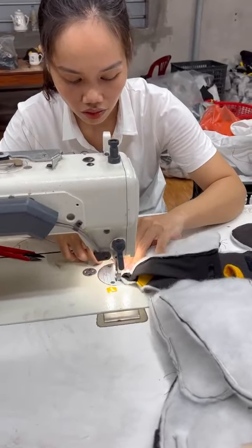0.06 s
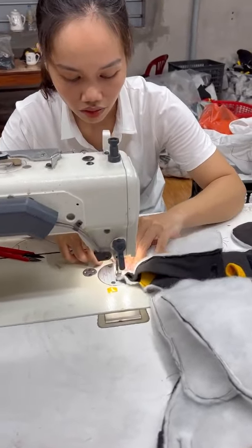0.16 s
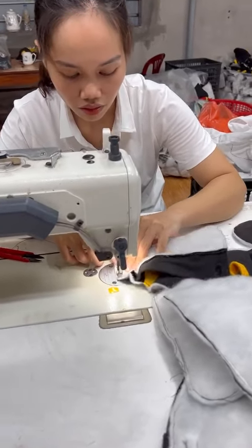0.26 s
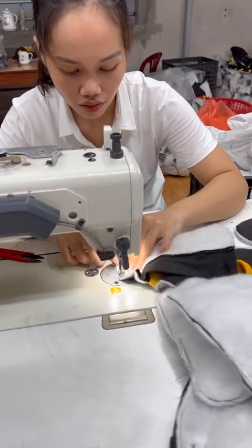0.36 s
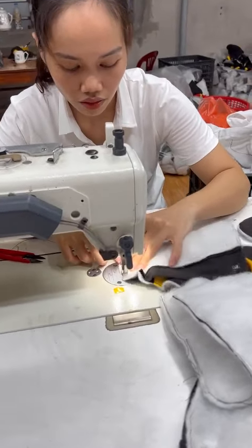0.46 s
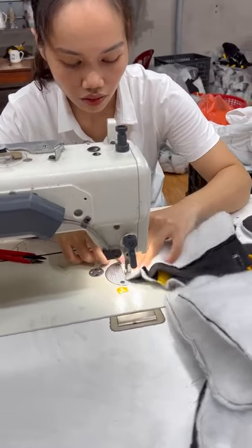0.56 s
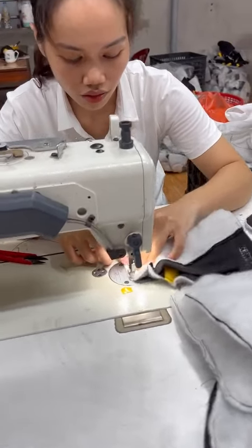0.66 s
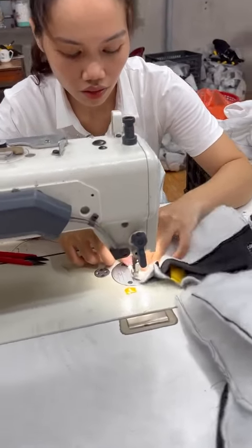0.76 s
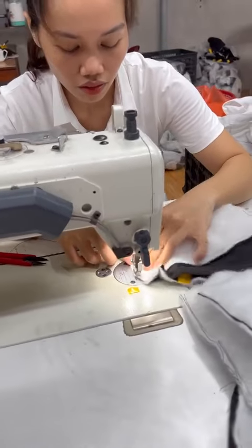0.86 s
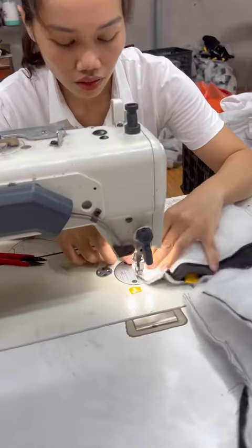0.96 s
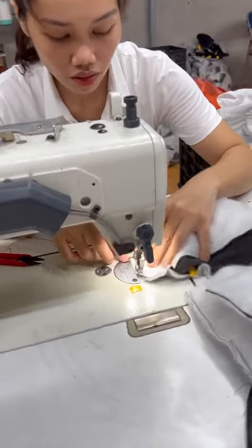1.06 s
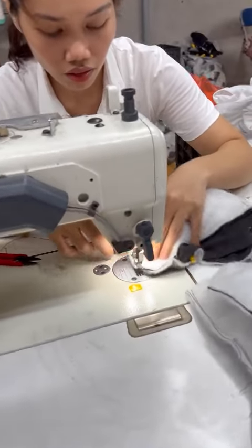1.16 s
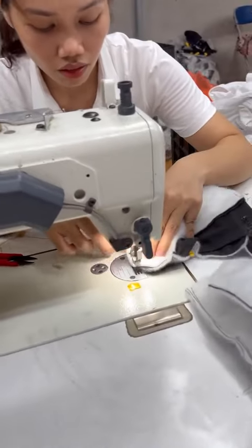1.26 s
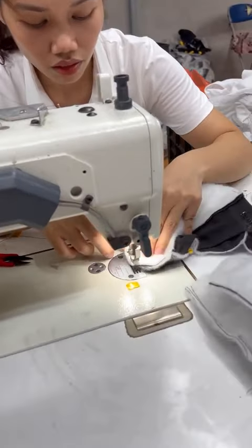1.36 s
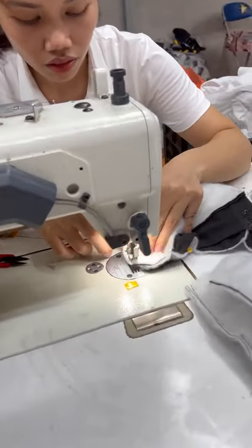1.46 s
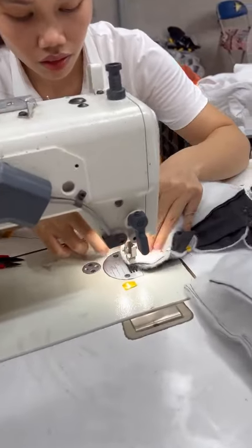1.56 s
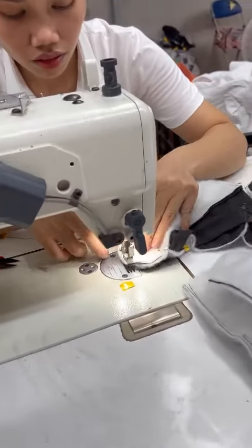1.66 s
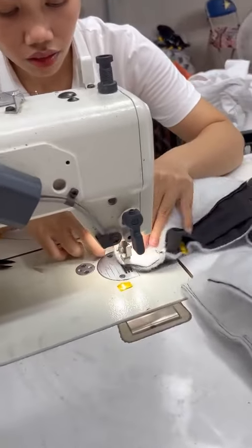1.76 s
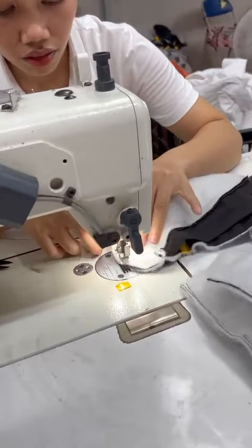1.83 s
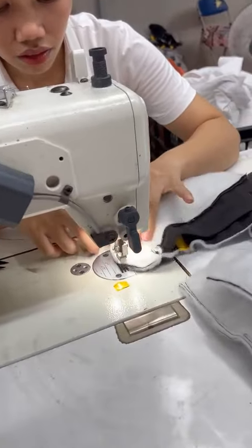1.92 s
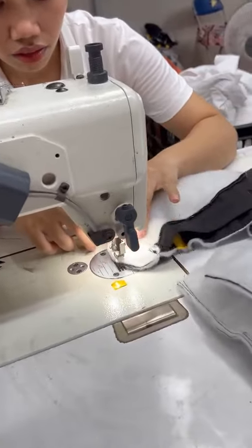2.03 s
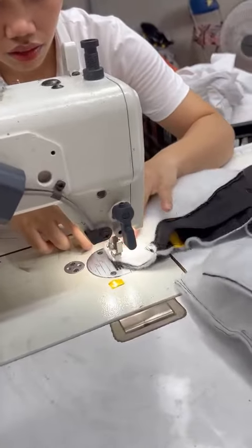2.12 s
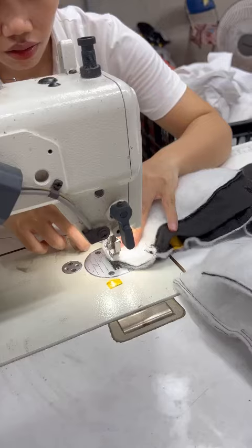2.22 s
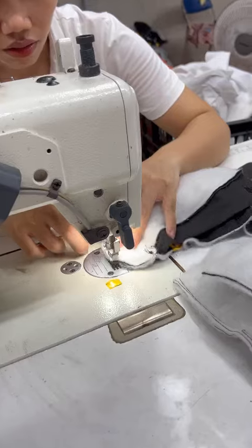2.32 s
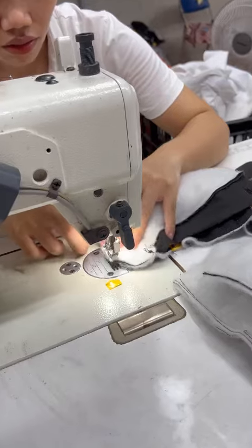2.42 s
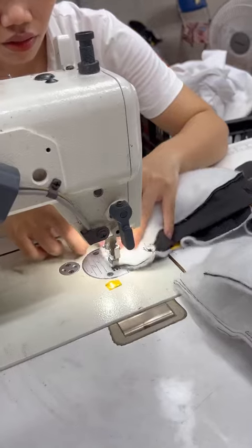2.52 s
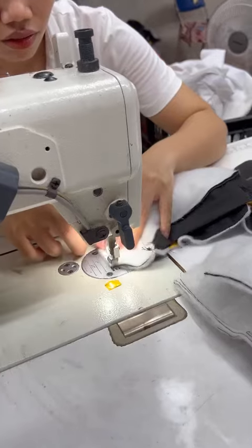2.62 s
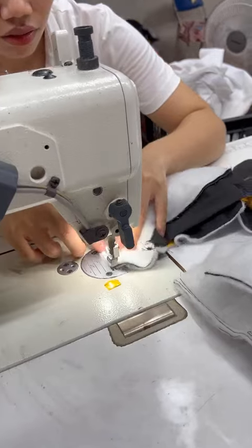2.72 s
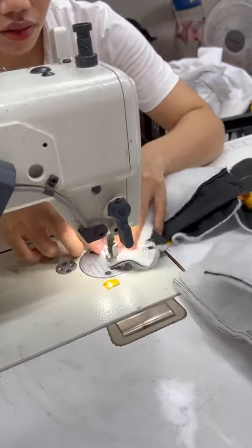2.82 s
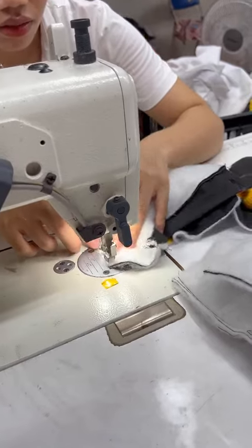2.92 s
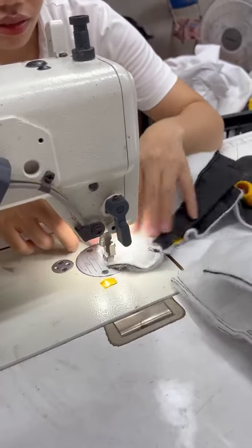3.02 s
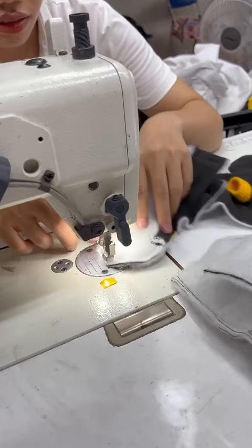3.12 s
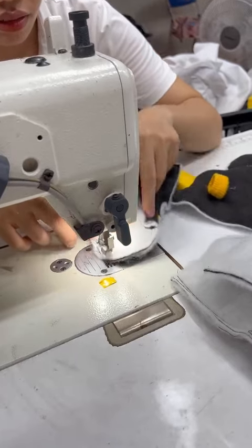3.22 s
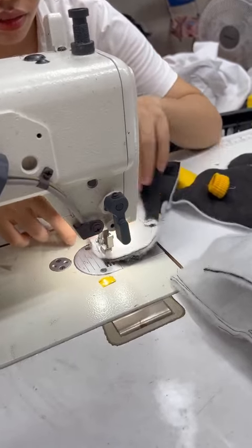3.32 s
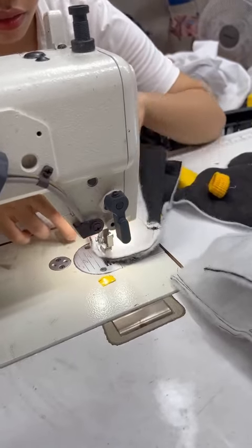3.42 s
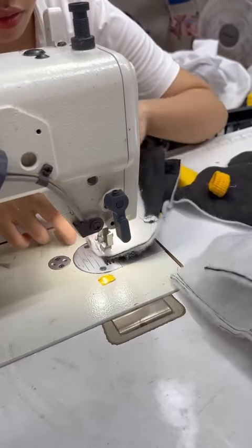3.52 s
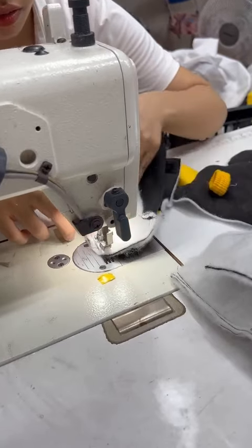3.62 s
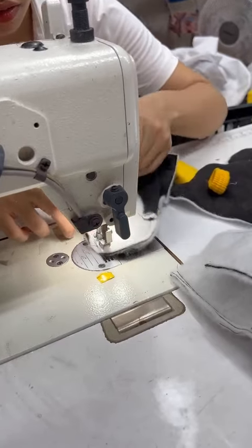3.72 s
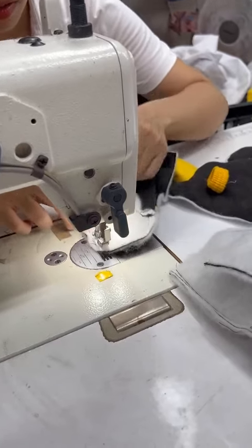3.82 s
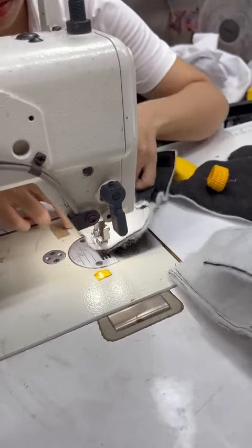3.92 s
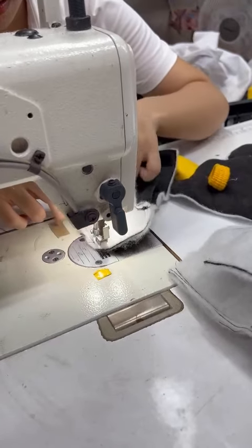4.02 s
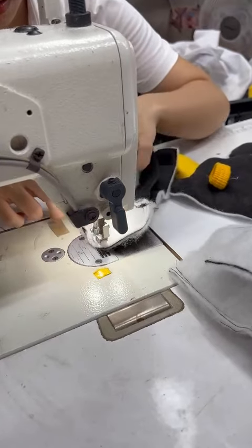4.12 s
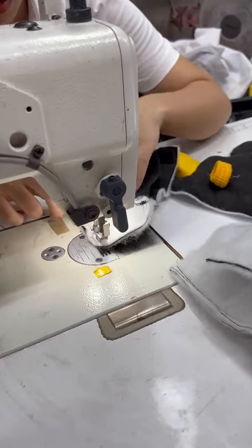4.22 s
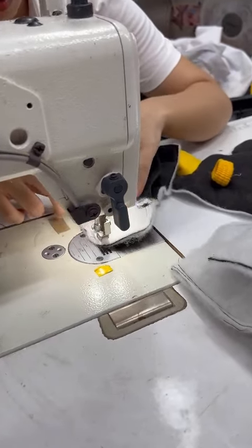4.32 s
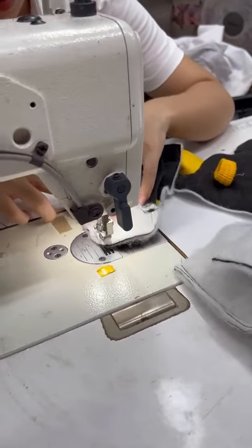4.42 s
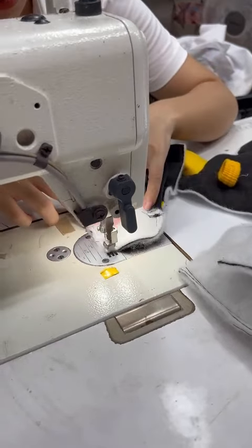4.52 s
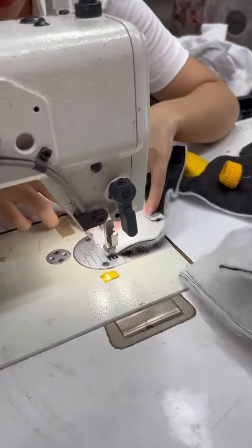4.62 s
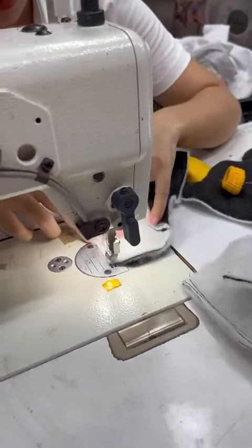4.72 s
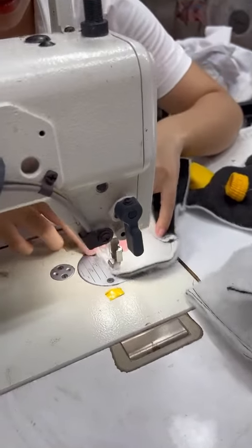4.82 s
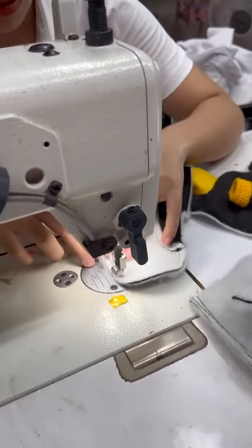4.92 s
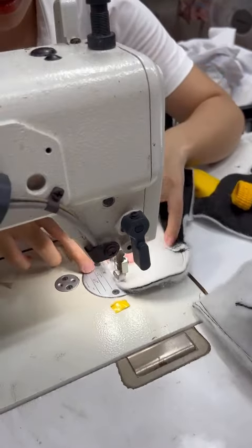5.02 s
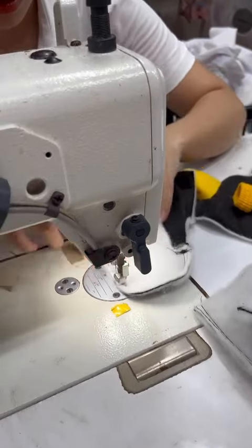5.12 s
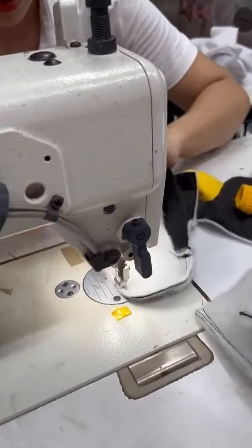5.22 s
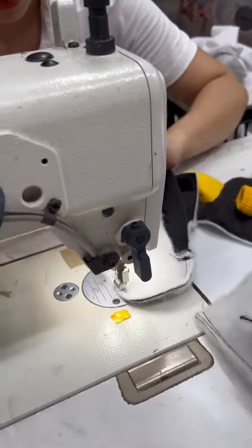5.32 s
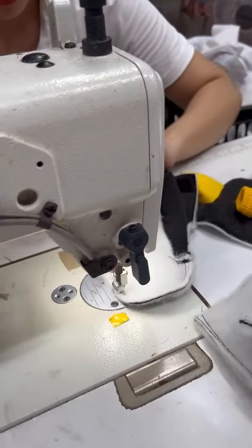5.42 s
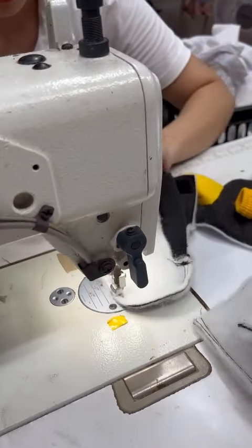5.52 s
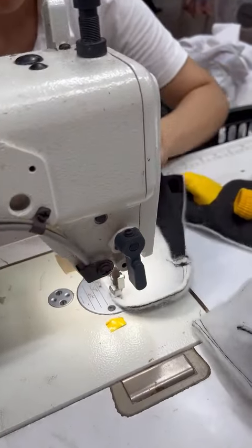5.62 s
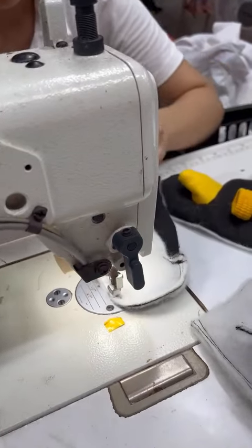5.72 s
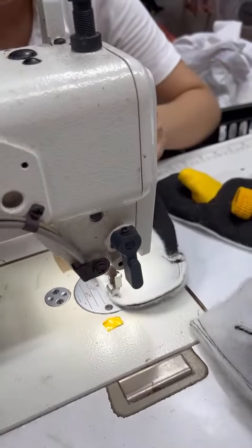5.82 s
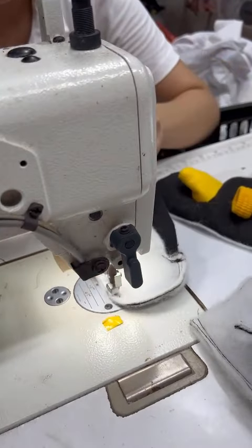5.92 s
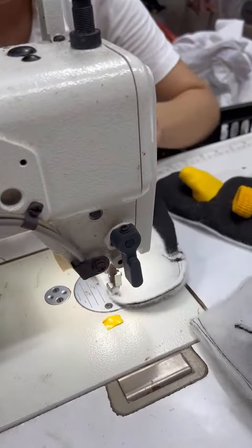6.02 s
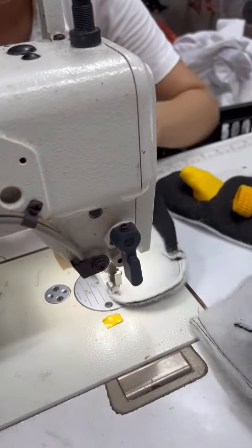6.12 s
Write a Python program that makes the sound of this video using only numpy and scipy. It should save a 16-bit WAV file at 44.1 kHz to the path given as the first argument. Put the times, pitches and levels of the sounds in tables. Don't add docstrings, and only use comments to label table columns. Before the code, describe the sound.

Two very short machine-gun-like stitching buzzes come early, then a loud clack of the presser foot and a pause with small clicks. A slightly louder burst comes midway, another foot clack follows, then a long pause of thuds and ticks before the last and longest burst. It ends in light clicks and table bumps. Close stereo microphone at the machine, modest indoor reverberation, constant low hum and fan behind.

```python
import sys
import numpy as np
from scipy import signal
from scipy.fft import rfft, irfft, next_fast_len
from scipy.io import wavfile
from scipy.ndimage import uniform_filter1d

SR = 44100
rng = np.random.default_rng(int(sys.argv[2]) if len(sys.argv) > 2 else 0)


def generate_wav(signal):
    frames = np.transpose(np.atleast_2d(signal))
    scaled = np.clip(frames, -1, 1) * 32767
    pcm = np.round(scaled).astype(np.int16)
    wavfile.write(sys.argv[1], SR, pcm)


def gain_from_db(level_db):
    decades = np.asarray(level_db, float) / 20
    return 10 ** decades


N = 272097
TOP_STITCHES_HZ = 70.0


def rms_one(x):
    return x / np.sqrt(np.mean(x ** 2) + 1e-20)


def in_time(tables, rest):
    t = np.arange(N) / SR
    out = np.full((len(tables[0][0]) - 1, N), float(rest))
    for rows in tables:
        s, *columns = np.transpose(rows)
        inside = (t >= s[0]) & (t <= s[-1])
        out[:, inside] = [np.interp(t[inside], s, column) for column in columns]
    return out


def colour(x, points, turn=1):
    size = next_fast_len(N)
    hz = np.arange(size // 2 + 1) * SR / size + 0.0011
    points = np.array(points)
    gain = gain_from_db(np.interp(np.log(hz), np.log(points[:, 0]), points[:, 1]))
    return irfft(rfft(x, size) * gain * turn, size)[..., :N]


def drift(rate):
    r = np.exp(-80 * np.pi * rate / SR)
    noise = rng.standard_normal(N // 40 + 2002)
    slow = signal.lfilter([1], [1, -2 * r, r * r], noise)[2000:]
    return np.interp(np.arange(N) / 40, np.arange(len(slow)), rms_one(slow))


def resonance(x, hz, width_hz):
    r = np.exp(-np.pi * width_hz / SR)
    poles = [1, -2 * r * np.cos(2 * np.pi * hz / SR), r * r]
    return signal.lfilter([(1 - r * r) / 2, 0, (r * r - 1) / 2], poles, x)


def ring(hz, t60, size):
    t = np.arange(size) / SR
    return np.sin(2 * np.pi * hz * t) * gain_from_db(-60 * t / max(t60, .005))


def add(out, s, sound):
    at = round(s * SR)
    out[at:at + len(sound)] += sound[:N - at]


# multiple of stitch rate, level in dB.
SHAKE_ORDERS = [(3, -27.5), (5, -16), (6, -21), (7, -27), (8, -23), (9, -22), (10, -33)]


def table_shake(angle, speed, once, twice, fourfold):
    higher = sum(gain_from_db(db + 3.5 * drift(12)) * np.cos(k * angle + .9 * k * k + .5 * drift(10))
                 for k, db in SHAKE_ORDERS)
    first = once * (np.cos(angle) + 0.62 * higher)
    third = gain_from_db(4.5) * (1 - speed / TOP_STITCHES_HZ) * np.cos(3 * angle)
    return first + fourfold * np.sin(4 * angle) - twice * (np.sin(2 * angle) + third)


def contacts(size, per_s, spread_db):
    strengths = gain_from_db(spread_db * np.minimum(rng.exponential(1, size), 5))
    signs = rng.choice([-1, 1], size)
    return rms_one(strengths * signs * (rng.random(size) < per_s / SR))


# frequency in Hz, level in dB per Hz.
RATTLE_COLOUR = [(60, -32.5), (100, -10.5), (200, -5.5), (380, -15), (640, -14), (780, -21), (1300, -21),
                 (2050, -12), (2810, -19.5), (6170, -26), (14400, -32), (15600, -35.5), (16500, -56.5)]
# frequency in Hz,
# width in Hz, level in dB.
CASTING = [(100, 25, 9), (380, 25, 5), (1270, 70, -7), (1620, 70, -2), (1780, 110, 1), (2040, 120, 1),
           (2310, 100, -2), (2450, 60, -2), (3450, 250, -7), (4640, 220, -3), (5760, 200, -9),
           (6200, 260, -3), (8030, 300, -11), (9400, 200, -12)]


def casting_rattle(angle, turns, speed):
    slots = 630
    one_turn = np.array([contacts(slots, per_s=5000, spread_db=3.0) for draw in "ab"])
    looped = one_turn[:, (turns % 1 * slots).astype(int)]
    hits = 0.45 * looped + np.array([contacts(N, per_s=4500, spread_db=2.5) for draw in "ab"])
    swell = gain_from_db(2.36 * np.cos(angle - 1.9) + 0.75 * np.cos(3 * angle))
    later = np.roll(hits, 5040, axis=1)
    rung = sum((-1) ** k * gain_from_db(db) * resonance(later, hz, width_hz)
               for k, (hz, width_hz, db) in enumerate(CASTING))
    bare = rms_one(colour(hits, RATTLE_COLOUR))
    rattle = rms_one(bare * swell ** .4 + .5 * rms_one(rung) * swell)
    treble = signal.sosfilt(signal.butter(2, 3000, "high", fs=SR, output="sos"), rattle)
    return rattle - treble * (1 - uniform_filter1d(speed, size=900) / TOP_STITCHES_HZ)


# multiple of stitch rate, level in dB over the rattle.
TEETH = [(14, -18.5), (18, -19.5), (23, -21), (25, -13), (26, -21.5), (29, -17), (30, -23.5), (33, -23.5),
         (35, -13)]


def gear_teeth(angle, speed):
    teeth = sum(gain_from_db(db + 3.0 * drift(12)) * np.sin(k * angle + k * k) for k, db in TEETH)
    return teeth * (speed / TOP_STITCHES_HZ) ** 16


def machine():
    speed, once, twice, fourfold, clatter = drive()
    turns = np.cumsum(speed) / SR
    angle = 2 * np.pi * turns
    shake = table_shake(angle, speed, once, twice, fourfold)
    rattle = casting_rattle(angle, turns, speed)
    rattle[0] += gear_teeth(angle, speed)
    rattle *= gain_from_db(2.5) * clatter
    return shake + rattle[0], rattle[1]


# up to speed in seconds, brake in seconds, table shake in dB,
# second order under it in dB, fourth order under it in dB.
BURSTS = [
    (-.3, -.096, -19, 12, -15),
    (0.161, 0.312, -14, -8, -12.5),
    (0.651, .735, -13.5, -8, -14),
    (2.656, 2.802, -11.5, -8.5, -17.5),
    (4.72, 4.921, -10.5, -8, -33),
]
# seconds from up to speed, shake in dB, second order in dB, rattle in dB.
RUN_UP = [
    (-.09, -52, -44, -33),
    (-.055, -42, -33, -11.5),
    (-.03, -25, -2.5, -4.5),
    (-.008, -2, 2.5, 0.04),
    (.04, 0.9, 1.2, 0.2),
]
# seconds from the brake, shake in dB, second order in dB, rattle in dB.
RUN_DOWN = [
    (-.015, 0.15, 1, -1),
    (.006, -1, -8.5, -9),
    (0.019, -10, -16, -15),
    (.034, -13.5, -11.5, -17.5),
    (0.093, -39.5, -27, -27),
    (.22, -89, -60.5, -30.5),
]
# seconds from up to speed, share of top speed.
SPIN_UP = [(-.09, .36), (-.045, .72), (-.015, .86), (0, .96), (.025, 1)]
# seconds from the brake, share of top speed.
SPIN_DOWN = [(.012, 1), (.035, .9), (.095, .43), (.22, .3)]


def drive():
    spins, levels = [], []
    for up, brake, db, second, fourth in BURSTS:
        spins.append([(at + s, share) for at, steps in ((up, SPIN_UP), (brake, SPIN_DOWN))
                      for s, share in steps])
        levels.append([(at + s, db + shake, db + second + twice, db + fourth + shake, db - 8.5 + rattle)
                       for at, steps in ((up, RUN_UP), (brake, RUN_DOWN))
                       for s, shake, twice, rattle in steps])
    speed = TOP_STITCHES_HZ * in_time(spins, rest=.3)[0]
    once, twice, fourfold, rattle = uniform_filter1d(gain_from_db(in_time(levels, rest=-120)), size=250)
    return speed, np.sqrt(2) * once, np.sqrt(2) * twice, np.sqrt(2) * fourfold, rattle


# frequency in Hz, level in dB, t60 in seconds.
LINKAGE_MODES = [(540, -3, .05), (950, -10, .04), (1620, -4, .045), (1900, -1, .03), (2490, 1, .03),
                 (3680, 0, .025), (4600, -7, .02), (4850, -8, .025), (5800, -7, .015), (6500, -5, .02),
                 (7300, -9, .012), (8150, -8, .012), (9200, -10, .012), (11000, -11, .01)]


def clicks(events, mid_top_hz):
    out, t = np.zeros(N), np.arange(4000) / SR
    bands = [signal.butter(4, edges, "band", fs=SR, output="sos")
             for edges in ([300, 1400], [1400, mid_top_hz], [5000, 16000])]
    for s, db, dull_db, bright_db, loud_hz, t60 in events:
        noise = signal.lfilter([.5], [1, -.75], rng.standard_normal(len(t)))
        crack = noise * gain_from_db(-60 * t / max(.8 * t60, .004))
        own_db = rng.normal(0, 4, len(LINKAGE_MODES))
        modes = sum(gain_from_db(mode_db + extra_db) * ring(hz, min(mode_t60, .9 * t60), len(t))
                    for (hz, mode_db, mode_t60), extra_db in zip(LINKAGE_MODES, own_db))
        struck = (crack + .3 * modes) * (1 - np.exp(-t / .0003))
        parts = [signal.sosfilt(band, struck) for band in bands]
        dull, mid, bright = [part / np.abs(part).max() for part in parts]
        loud_db = bright_db if loud_hz > 5000 else dull_db if loud_hz < 1200 else 0
        loud = ring(loud_hz, t60 * min(.9, 2600 / loud_hz), len(t)) * (1 - np.exp(-t * loud_hz))
        click = gain_from_db(dull_db) * dull + .9 * mid + gain_from_db(bright_db) * bright + .35 * gain_from_db(loud_db) * loud
        add(out, s - .0008, gain_from_db(db) * click)
    return out


# start in seconds, peak in dB, loudest ring in Hz, extra loss a rebound in dB.
DROPS = [
    (1.0623, -3, 1910, 4),
    (3.1814, -8, 1650, 1),
]
LIFTS = [
    (2.4463, -22.5, 2358, 0.38),
    (4.4841, -21, 2484, 0.27),
]
# seconds after, level in dB, dull part in dB, bright part in dB, t60 in seconds.
DROP = [
    (0, -13, -16, 0, 0.022),
    (.0033, -1.4, -14.5, -3, 0.03),
    (0.0099, -9, -4.5, -7.5, 0.083),
    (.027, -9, -17.5, -15.5, .022),
    (.042, -27, -24, -12.5, 0.035),
]
LIFT = [
    (-.011, -5, -13, -4, 0.018),
    (-.0067, -4.5, -39.5, -9, 0.067),
    (0, -0.6, -5.5, 4, 0.038),
    (0.0109, -1, -4, 1.5, .022),
    (0.026, -4, -8.5, -7.5, 0.057),
]


def foot(moves, pattern):
    return [(s + after, db + step_db - k * loss_db, dull_db, bright_db, hz, t60)
            for s, db, hz, loss_db in moves
            for k, (after, step_db, dull_db, bright_db, t60) in enumerate(pattern)]


# start in seconds, peak in dB, bright part in dB,
# loudest ring in Hz.
TICKS = [(0.0616, -33, -8, 2710), (.0733, -34, -3, 2210), (0.3535, -23, -25, 1960),
         (0.405, -37, -1.1, 2140), (0.45, -39, -6, 2820), (0.549, -34.5, -5, 2200), (0.584, -32, -2, 2090),
         (.804, -20, -15, 2060), (0.871, -32, 0, 1920), (0.905, -41.5, 2.5, 6100),
         (.9525, -36.5, -20, 2750), (2.5656, -28, 3, 2030), (2.58, -21.5, -4, 1940),
         (2.9651, -28.5, 2.5, 1960), (4.389, -49.5, -10.5, 1300), (4.6149, -32, 4, 2700),
         (4.6307, -27, -4, 2070), (4.6666, -31, 6, 1820), (5.1048, -28, 0.5, 2720),
         (5.121, -32.5, -14, 2130), (5.145, -33, -9.5, 2220), (5.2064, -47.5, 2, 2400),
         (3.008, -43, -1, 5900), (5.174, -40, -11, 2120)]
# start in seconds, peak in dB, dull part in dB,
# loudest ring in Hz, t60 in seconds.
KNOCKS = [(0.784, -31, 5.5, 372.5, 0.013), (0.9128, -38.5, 12, 502, 0.12), (0.951, -36.5, 6, 691, 0.1),
          (2.4502, -37.5, 8.5, 343, 0.08), (2.876, -33.5, 7, 377, 0.038), (3.03, -38, 13.5, 404, 0.17),
          (3.0713, -34.5, -1, 660, 0.067), (4.4837, -29, -2, 385, 0.055), (4.99, -38, 11.5, 362, 0.079),
          (5.138, -49.5, 10, 355, 0.06)]


def linkage():
    ticks = [(s, db, -16.5, bright_db, hz, 0.037) for s, db, bright_db, hz in TICKS]
    knocks = [(s, db, dull_db, -41, hz, t60) for s, db, dull_db, hz, t60 in KNOCKS]
    metal = ticks + foot(DROPS, DROP) + foot(LIFTS, LIFT)
    return clicks(metal, mid_top_hz=5830) + clicks(knocks, mid_top_hz=3845)


# start in seconds, peak in dB, pitch in Hz, t60 in seconds.
THUDS = [(2.282, -31, 120.7, 0.38), (2.338, -31.5, 119.3, 0.36), (4.388, -30.5, 118.6, 0.64),
         (4.423, -30.5, 90, 0.89), (5.1, -32.5, 277, 0.37), (5.199, -28.5, 149, 0.2),
         (5.42, -36.5, 276, 0.53)]
# seconds after, peak in dB, pitch in Hz, t60 in seconds.
AFTER_BRAKE = [
    (.047, -16.5, 94.2, 0.12),
    (0.102, -23.5, 78, 0.19),
    (.149, -27.5, 94.5, .25),
]
AFTER_DROP = [
    (-.13, -23, 84, 0.42),
    (-.1, -30.5, 74.9, 0.3),
    (.009, -23.5, 118, .17),
    (0.036, -29, 78, .35),
]
AFTER_LIFT = [
    (.015, -16, 71.3, 0.083),
    (0.049, -34, 85.4, 0.13),
    (.105, -23.5, 97, .14),
]


def pushes():
    out = list(THUDS)
    for causes, column, pattern in ((BURSTS, 1, AFTER_BRAKE), (DROPS, 0, AFTER_DROP), (LIFTS, 0, AFTER_LIFT)):
        for cause in causes:
            out += [(cause[column] + after, *push) for after, *push in pattern if cause[column] + after >= 0]
    return out


# frequency in Hz, level in dB, t60 in seconds.
TABLE_MODES = [(85.2, -9.5, 0.63), (136, -5.5, 0.31), (193, -3.5, 0.14), (278.9, -14, 0.46),
               (385, -3, 0.091), (648, -11.5, 0.1)]


def thuds():
    out, t = np.zeros(N), np.arange(20000) / SR
    for s, db, hz, t60 in pushes():
        own_db = rng.normal(0, 2.5, len(TABLE_MODES))
        others = sum(gain_from_db(mode_db + extra_db) * ring(mode_hz, mode_t60, len(t))
                     for (mode_hz, mode_db, mode_t60), extra_db in zip(TABLE_MODES, own_db))
        soft_start = 1 - np.exp(-t / 0.00537)
        add(out, s, gain_from_db(db) * (ring(hz, t60, len(t)) + .5 * others) * soft_start)
    return out


def room(x):
    t60_s, level_db, wall_cut_hz = 0.65, -19, 75000
    t, tails = np.arange(SR) / SR, 0
    for low, high in ((250, 1000), (1000, 3000), (3000, 7000), (7000, 11000), (11000, 17000)):
        t60 = t60_s / (1 + np.sqrt(low * high) / wall_cut_hz)
        band = signal.butter(2, [low, high], "band", fs=SR, output="sos")
        tails = tails + signal.sosfilt(band, rng.standard_normal((2, SR))) * gain_from_db(-60 * t / t60)
    tails = tails * (1 - np.exp(-(t / 0.0018) ** 2))
    tails = tails / np.sqrt(np.sum(tails ** 2) / 2)
    return gain_from_db(level_db) * signal.fftconvolve(x[None], tails, axes=1)[:, :N]


# frequency in Hz, level in dB per Hz.
SHOP_COLOUR = [(22, -51), (40, -6), (60, 2.5), (89, -1.5), (117, 1.5), (260, -2), (438, -7.5), (520, -12.5),
               (1000, -16), (1500, -22), (2100, -24.5), (5500, -41.5), (8000, -41.5), (9200, -81.5),
               (11500, -58), (15500, -77)]
# multiple of the fan rate, level in dB.
FAN = [(1, -54), (2, -62), (3, -54), (4, -56.5), (7, -68.5)]
# frequency in Hz, width in Hz, level in dB.
INVERTER = (7520, 390, -68)


def shop():
    hum = rms_one(colour(rng.standard_normal((2, N)), SHOP_COLOUR))
    hum = hum * gain_from_db(-43 + .6 * drift(2.5) + .8 * drift(14))
    fan_hz = 63.55 * (1 + 0.00614 * drift(1.53))
    fan_angle = 2 * np.pi * np.cumsum(fan_hz) / SR
    drone = sum(gain_from_db(db + 3.5 * drift(2.2)) * np.sin(k * fan_angle) for k, db in FAN)
    hz, width_hz, db = INVERTER
    whine = resonance(resonance(rng.standard_normal((2, N)), hz, width_hz), hz, width_hz)
    return hum + drone + gain_from_db(db + 0.5 * drift(30.5)) * rms_one(whine)


# frequency in Hz, level in dB.
PORTS_NEAR = [(60, -76.5), (110, -51), (200, -25), (380, -14), (700, -6.5), (1290, -8), (2380, -18),
              (4400, -11), (8120, 0.5), (15000, -2)]
PORTS_FAR = [(60, -40), (110, -41), (200, -26.5), (380, -8.5), (700, -2), (1290, -4), (2380, -9),
             (4400, -4), (8120, -1), (15000, -3)]


def scene():
    stitching, other_rattle = machine()
    near = stitching + linkage()
    diffuse = room(near) + shop()
    near = near + thuds()
    side = .7 * colour(near, PORTS_NEAR, turn=-1j) + .7 * colour(other_rattle, PORTS_NEAR)
    side = side + colour(diffuse[1], PORTS_FAR)
    middle = near + diffuse[0]
    return np.array([middle + side, middle - side])


def band_limit(x):
    return signal.sosfilt(signal.butter(12, 17030, fs=SR, output="sos"), x)


# frequency in Hz, level in dB.
MICROPHONE = [(15, -20), (28, -6), (45, 0), (20000, -1.5)]


def record(dry):
    rounded = 1.354 * np.tanh(colour(dry, MICROPHONE) / 1.115)
    top_cut = signal.cheby2(10, 60, 16900, fs=SR, output="sos")
    mix = signal.sosfilt(top_cut, rounded)
    return band_limit(mix)


dry = scene()
out = record(dry)
generate_wav(out)
```